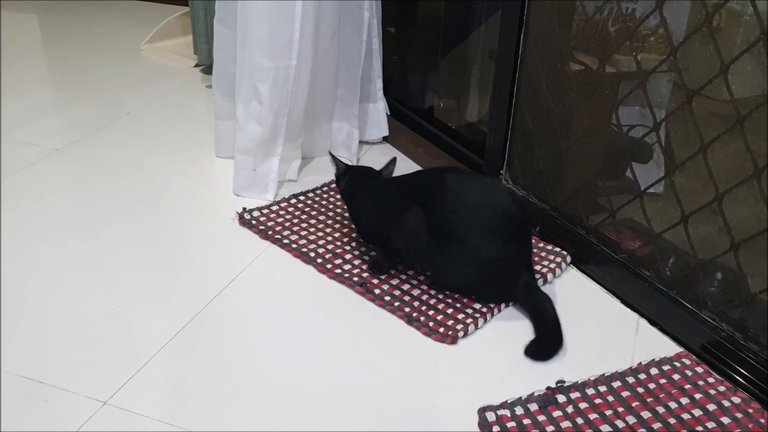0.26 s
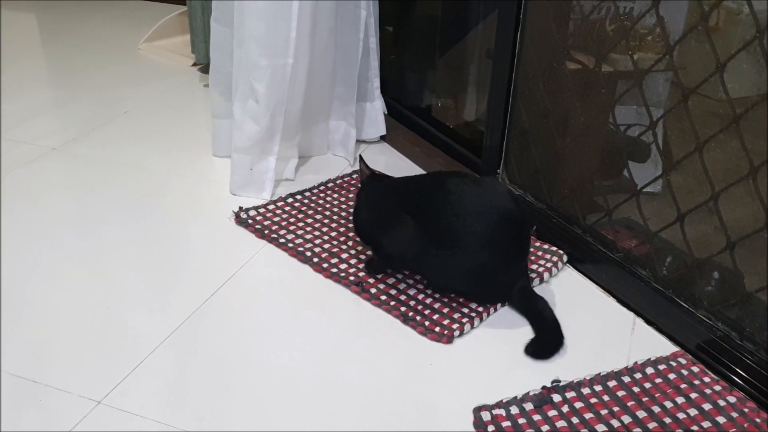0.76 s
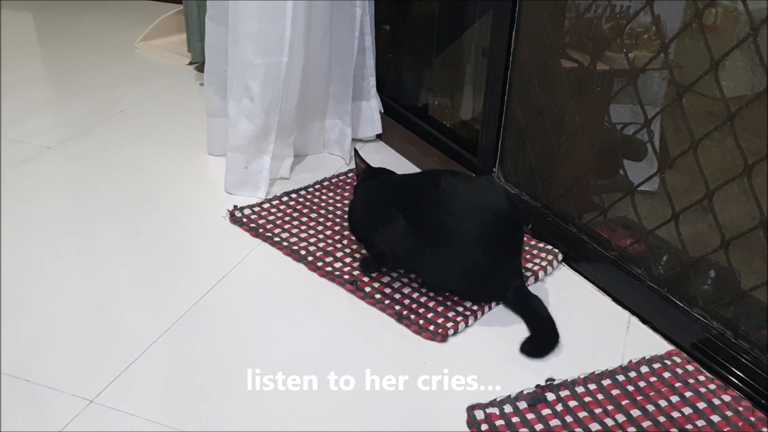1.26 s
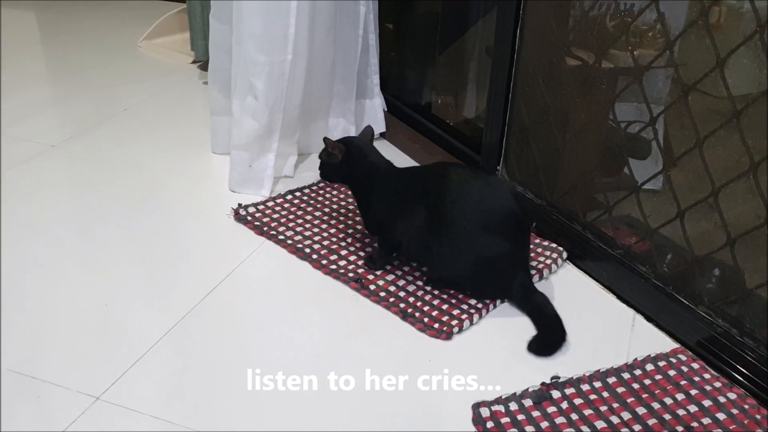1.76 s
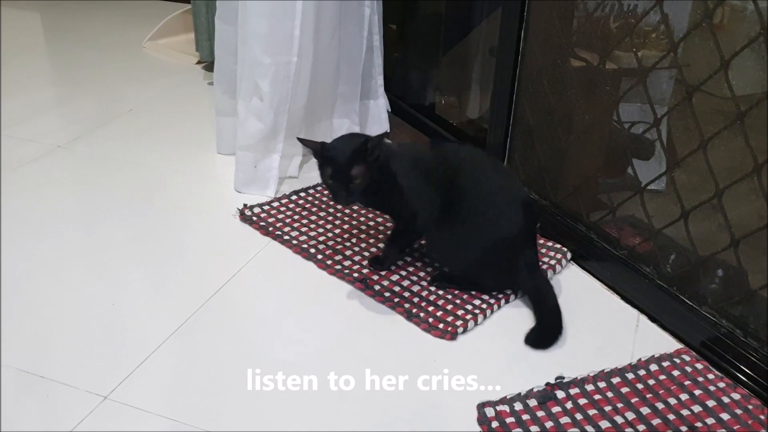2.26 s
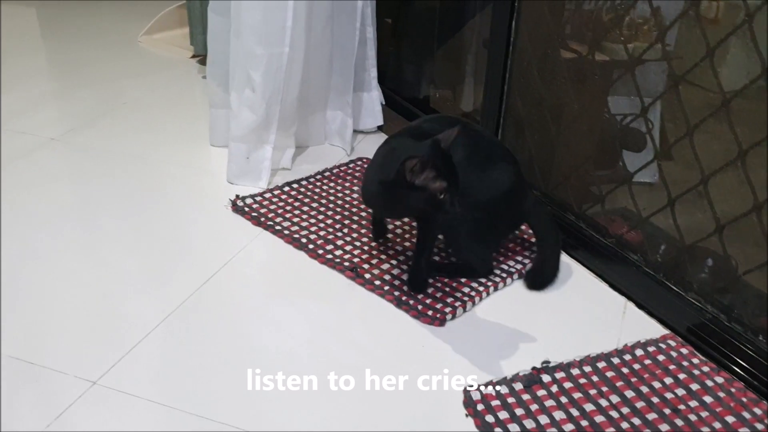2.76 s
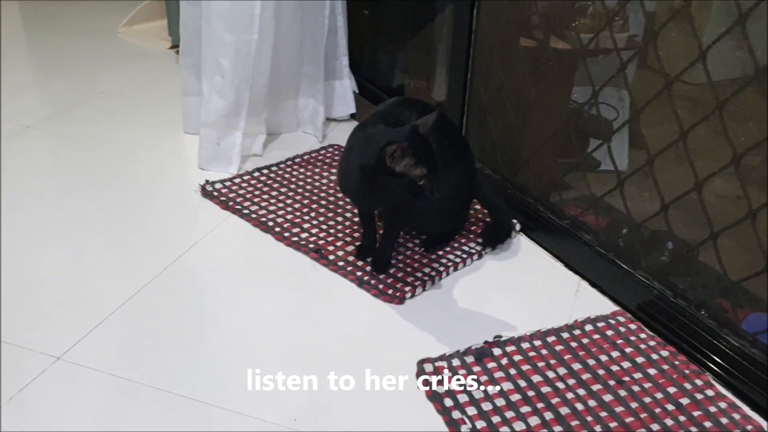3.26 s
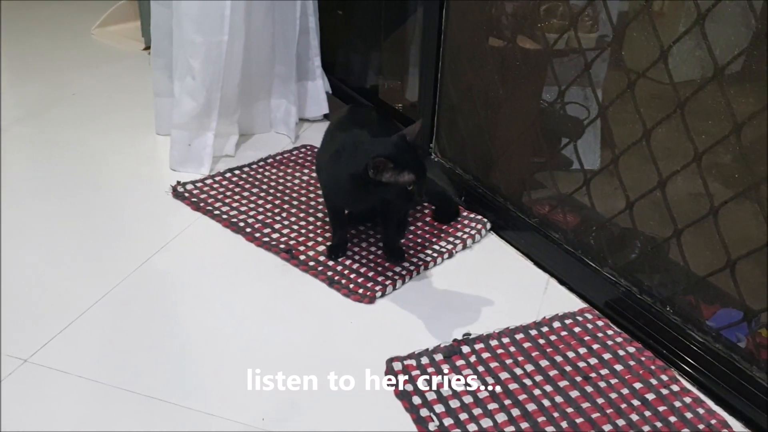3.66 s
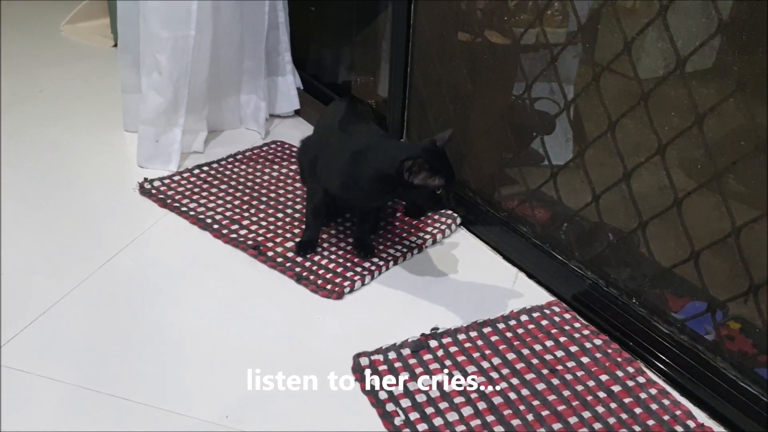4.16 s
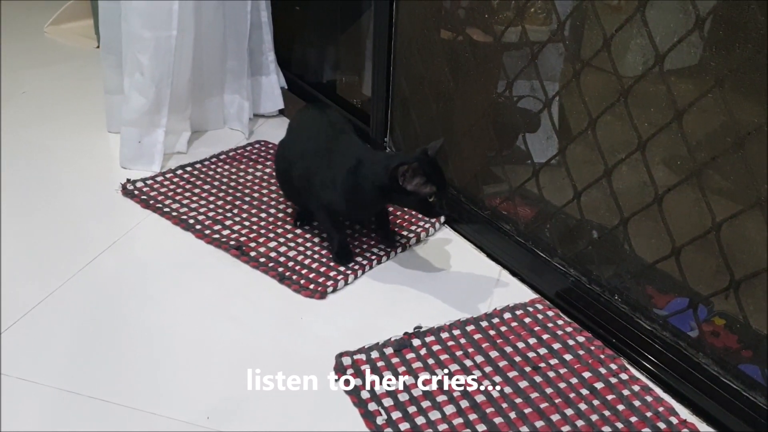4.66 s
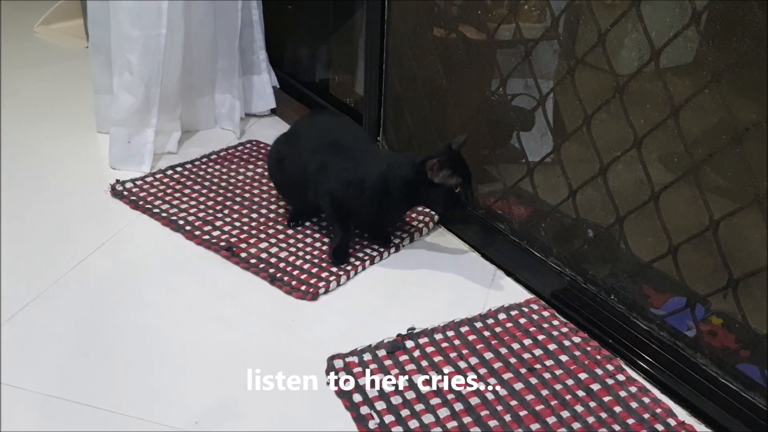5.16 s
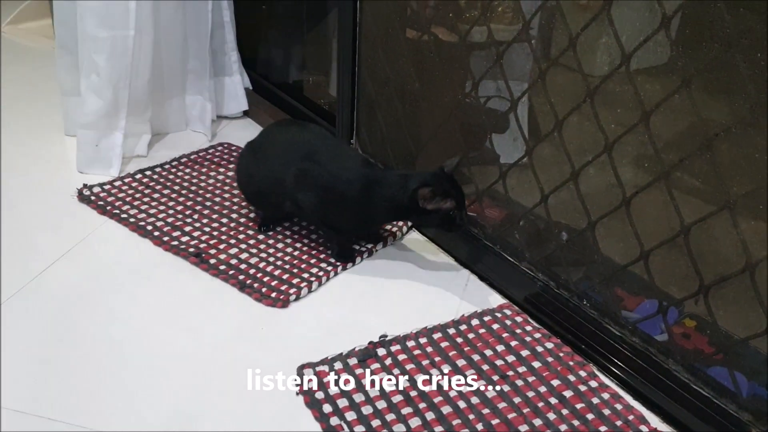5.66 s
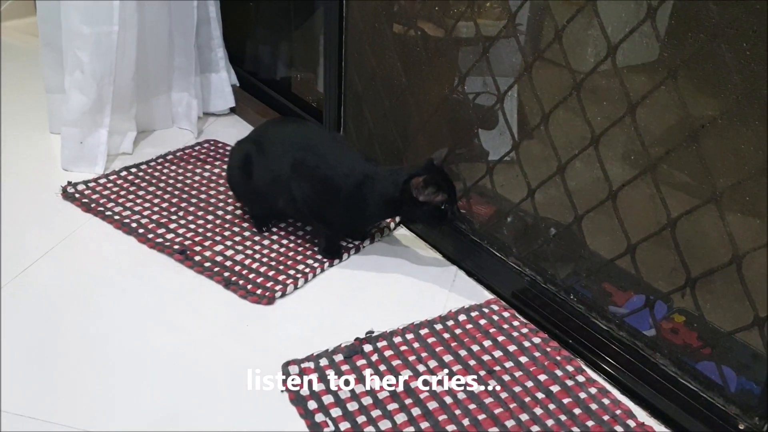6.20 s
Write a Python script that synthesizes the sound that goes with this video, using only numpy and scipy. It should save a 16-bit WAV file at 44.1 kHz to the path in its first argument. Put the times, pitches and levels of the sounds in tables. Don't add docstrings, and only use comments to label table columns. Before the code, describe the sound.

A cat about two metres away yowls four times in a hard tiled room. Two short, quiet, raspy moans come first, then a much louder open-mouthed wail and a longer, fuller final cry. Underneath, a low fan motor hums with a slow beat, something brushes faintly once a second, and insects trill very softly outside. Fur rustles slightly and claws tick before the last call. Phone pickup in stereo.

```python
import sys
import numpy as np
from scipy import signal
from scipy.fft import rfft, irfft, next_fast_len
from scipy.io import wavfile
from scipy.ndimage import map_coordinates

SR = 44100
rng = np.random.default_rng(int(sys.argv[2]) if len(sys.argv) > 2 else 0)


def store_pcm(level_fs):
    pcm = np.round(np.clip(level_fs, -1, 1) * 32767).astype(np.int16)
    wavfile.write(sys.argv[1], SR, np.atleast_2d(pcm).T)


def volts_from_db(level):
    exponent = np.asarray(level, float) / 20
    return 10 ** exponent


N = 283563


def unit(x):
    return x / np.sqrt(np.mean(x ** 2) + 1e-20)


def along(points, hz):
    f, v = np.transpose(points)
    return np.interp(np.log(hz + 1), np.log(f + 1), v)


def wobble(rate, size=N):
    steps = np.arange(0, size + 16, 16)
    knots = rng.standard_normal(int(size * rate / SR) + 5)
    return np.interp(np.arange(size), steps, map_coordinates(knots, [steps * rate / SR]))


def filtered(x, response):
    m = next_fast_len(x.shape[-1] + 8192)
    spectrum = rfft(x, m) * response(np.fft.rfftfreq(m, 1 / SR))
    return irfft(spectrum, m)[..., :x.shape[-1]]


def swells(events):
    t, env = np.arange(N) / SR, 0
    for s, length, db in events:
        u = np.clip((t - s) / length, 0, None)
        env = env + volts_from_db(db) * 4 * u * np.exp(-2 * u)
    return env


def paired(two, alike):
    turn = lambda hz: np.arccos(np.clip(along(alike, hz), -1, 1)) / 2
    mid, side = filtered(two, lambda hz: np.array([np.cos(turn(hz)), np.sin(turn(hz))]))
    return np.array([mid + side, mid - side])


# (frequency [Hz], likeness [-1 to 1])
PORT_LIKENESS = [(60, 0.99), (130, 0.88), (290, 0.44), (640, 0.68), (1410, 0.077), (3100, -0.35),
                 (6820, 0.066), (15000, -0.27)]


def rush(spectrum):
    noise = paired(rng.standard_normal((2, N)), PORT_LIKENESS)
    return unit(filtered(noise, lambda hz: volts_from_db(along(spectrum, hz))))


# (frequency [Hz], level [dB per Hz])
AIR = [(20, -31.5), (40, -8.5), (52, -6.5), (75, -4.5), (130, -2.5), (155, -12.5), (350, -17.5), (700, -33),
       (1200, -35), (6500, -42.5), (8200, -50.5), (10500, -40), (15800, -41.5)]


def room_air():
    return volts_from_db(-61.5 + 0.42 * wobble(2.3)) * rush(AIR)


# (frequency [Hz], level [dB])
TRILL = [(8700, -39.5), (9050, -2), (9400, -4), (9950, -2), (10350, -39.5)]


def insects():
    return volts_from_db(-75.5 + 0.64 * wobble(2) + 2.1 * wobble(90)) * rush(TRILL) * volts_from_db([[-1.5], [1.5]])


# (frequency [Hz], width [Hz], level over the hum [dB])
MOTOR_LINES = [(56.5, 0.85, 1), (68.3, 2.3, -16.5), (120.9, 4.3, -16)]
# (frequency [Hz], level [dB])
WHINE = [(700, -37.5), (790, -7.5), (815, -3.5), (845, -5.5), (940, -42.5)]
HUM_DB, HUM_BEAT_HZ, HUM_BEAT_DB, HUM_PEAK_S = -50, 2.15, 1.5, .29
WHINE_DB, WHINE_SWAY_DB, SWEEP_S, TURNED_AWAY_S = -85, 4.5, 3.1, 1.7


def motor():
    t, lines = np.arange(N) / SR, 0
    for hz, width, db in MOTOR_LINES:
        drift = 2 * np.pi * np.cumsum(0.36 * width * wobble(2 * width)) / SR
        strength = volts_from_db(db + 2.0 + 0.55 * width * wobble(1.5 * width + 3))
        lines = lines + strength * np.sin(2 * np.pi * hz * t + drift)
    beat_db = HUM_BEAT_DB * np.cos(2 * np.pi * HUM_BEAT_HZ * (t - HUM_PEAK_S))
    hum_db = HUM_DB + beat_db + .6 * wobble(5)
    sway_db = -WHINE_SWAY_DB * np.cos(2 * np.pi * (t - TURNED_AWAY_S) / SWEEP_S)
    whine_db = WHINE_DB + sway_db + 1.5 * wobble(3.6)
    return volts_from_db(hum_db) * lines + volts_from_db(whine_db + 2.5) * rush(WHINE)


# (frequency [Hz], level [dB])
BRUSH = [(500, -18), (1100, -6.5), (1370, 6), (1500, -3.5), (1640, -1.5), (2300, -4.5), (3500, -15.5),
         (8000, -21.5), (15000, -26)]
STROKES = [-66, -68.5, -72, -72, -66, -70.5, -65.5]
STROKE_S, STROKE_EVERY_S = .335, 0.99


def brush():
    strokes = [(STROKE_S + k * STROKE_EVERY_S, .075, db) for k, db in enumerate(STROKES)]
    return swells(strokes) * rush(BRUSH)


# (frequency [Hz], level [dB])
FUR = [(2000, 6.5), (4000, -6.5), (6500, 4.5), (8200, -12), (11000, 0.5), (15500, -8.5)]
# (time [s], length [s], level [dB])
RUSTLES = [
    (.72, 0.067, -66),
    (.97, 0.059, -66),
    (3.31, 0.046, -72),
    (4.57, 0.06, -72.5),
]


def fur():
    return swells(RUSTLES) * volts_from_db(2.6 * wobble(120)) * rush(FUR)


# (frequency [Hz], level [dB])
TICK = [(1500, -6), (3500, -2.5), (6000, -1), (9300, 11), (11000, -14), (15000, -19.5)]
# (time [s], peak level [dB])
TICKS = [
    (4.5334, -53),
    (4.5521, -42),
    (4.6084, -56),
]


def claws():
    out, t = np.zeros(N), np.arange(200) / SR
    for s, db in TICKS:
        tick = volts_from_db(db - 3 - 60 * t / .002) * np.sign(rng.standard_normal(len(t)))
        out[round(s * SR):][:len(t)] += tick
    return filtered(out, lambda hz: volts_from_db(along(TICK, hz)))


# (opening [0-1], partials 1, 2, 3, 4 under the effort [dB])
MOUTH = [(0, -0.5, -21, -21, -53), (.3, -2.5, -7, -17.5, -42), (.5, -10, -0.5, -19, -27),
         (.65, -15, -2, -6, -20), (.78, -24.5, -1, -14.5, -9), (1, -18, -9.5, -9.5, -3)]


def mouth_levels(t, effort_db, mouth, tongue, quaver):
    opening, *shapes = np.transpose(MOUTH)
    levels_db = []
    for shape_db, lift_db in zip(shapes, tongue):
        levels_db.append(effort_db + np.interp(mouth, opening, shape_db) + lift_db * mouth)
    crest_s, quaver_hz, depth_db = quaver
    pushed = volts_from_db((effort_db - effort_db.max()) / 2)
    levels_db[1] += depth_db * pushed * np.cos(2 * np.pi * quaver_hz * (t - crest_s))
    return levels_db


FLUTTER_DB = 13


def low_partials(levels_db, hoarse, turn):
    n, voice = len(turn), 0
    flutter_db = FLUTTER_DB * hoarse * np.minimum(wobble(70, n), .2)
    for k, db in enumerate(levels_db, 1):
        sway_db = (0.41 + 1.1 * hoarse) * wobble(30, n) + 1.4 * wobble(13.98, n)
        voice = voice + volts_from_db(db + sway_db + flutter_db) * np.sin(k * turn)
    return voice


SLACK_DB, TAUT_DB = -46, -34


def upper_partials(hz, strain_db, hoarse, turn, throat, peak_hz, height_db):
    upper, power = 0, 1e-12
    taut = np.interp(strain_db, [SLACK_DB, TAUT_DB], [0, 1])
    full_lift_db = height_db * np.clip(1 - hoarse, 0, 1) * taut
    for k in np.arange(7, 24):
        lift_db = full_lift_db / (1 + ((k * hz - peak_hz) / 380) ** 2)
        gain = volts_from_db(along(throat, k * hz) + lift_db)
        tone = np.sin(k * turn + rng.uniform(0, 2 * np.pi))
        upper = upper + gain * volts_from_db(4 * wobble(12.2, len(turn))) * tone
        power = power + gain ** 2
    return upper / np.sqrt(power)


BREATH_FOLLOWS, HISS_FOLLOWS = .16, .3
BREATH_HOARSE_DB, SHUT_DULLS_DB = 7, 13


def breath_air(puffs, under_peak_db, mouth, hoarse, spectrum, full_db):
    breath_db = full_db + BREATH_FOLLOWS * under_peak_db + BREATH_HOARSE_DB * (hoarse - .4)
    breath = filtered(puffs, lambda f: volts_from_db(along(spectrum + [(9000, -69.5)], f)))
    breath = volts_from_db(breath_db) * unit(breath)
    deep = filtered(breath, lambda f: f < 700)
    lips_db = SHUT_DULLS_DB * (np.clip(mouth, 0, 1) - 0.67)
    hiss_db = HISS_FOLLOWS * np.minimum(under_peak_db + 15, 0)
    return deep + (breath - deep) * volts_from_db(lips_db + hiss_db)


def throat_rasp(puffs, bright_db, hoarse, throat):
    noise = unit(filtered(puffs, lambda f: volts_from_db(along(throat, f)) * (f > 3200)))
    return volts_from_db(bright_db - 16.5) * np.minimum(.3 + 7 * hoarse, 5) * noise


def yowl(rows, throat, breath_spectrum, tract, rough, quaver, tongue):
    s, *cols = np.transpose(rows)
    t = np.arange(s[0], s[-1], 1 / SR)
    n, since, left = len(t), t - t[0], t[-1] - t
    hz, effort_db, mouth, strain_db = [np.interp(t, s, c) for c in cols]
    bright_db = effort_db + strain_db
    first_hz, last_hz, height_db, full_breath_db = tract
    peak_hz = np.interp(t, s[[0, -1]], [first_hz, last_hz])

    steady, first, fade_s, last, rise_s = rough
    hoarse = steady + first * np.exp(-since / fade_s) + last * np.exp(-left / rise_s)
    jitter = .002 * wobble(40, n) + .035 * hoarse * wobble(140, n)
    turn = 2 * np.pi * np.cumsum(hz * (1 + jitter)) / SR

    low_db = mouth_levels(t, effort_db, mouth, tongue, quaver)
    bridge_db = (low_db[-1] + bright_db) / 2 + 9 - 9 * hoarse
    low_db += [bridge_db + along(throat, k * hz) for k in (5, 6)]
    voice = low_partials(low_db, hoarse, turn)
    upper = upper_partials(hz, strain_db, hoarse, turn, throat, peak_hz, height_db)
    voice = voice + volts_from_db(bright_db - 8.1 * hoarse) * upper
    voice = np.sqrt(2) * voice * (1 + .35 * hoarse * wobble(250, n))

    puffs = rng.standard_normal((2, n)) * (1 + 0.77 * np.cos(turn))
    under_peak_db = effort_db - effort_db.max()
    breath = breath_air(puffs[0], under_peak_db, mouth, hoarse, breath_spectrum, full_breath_db)
    rasp = throat_rasp(puffs[1], bright_db, hoarse, throat)
    voice_edge = np.clip(np.minimum(since / .011, left / .04), 0, 1)
    breath_edge = np.clip(np.minimum(since, left) / 0.038, 0, 1)
    call = (voice + rasp) * voice_edge + breath * breath_edge
    return np.pad(call, (round(s[0] * SR), N))[:N]


# (time [s], pitch [Hz], effort [dB], mouth opening [0-1], strain [dB])
YOWL_1 = [
    (.63, 451.7, -72, 0, -30),
    (.71, 498.4, -57.5, 0.25, -23),
    (.8, 484, -58, 0.31, -30),
    (.95, 488.7, -57, 0.28, -28),
    (1.03, 515.5, -51.5, 0.33, -31),
    (1.09, 509.3, -50, 0.29, -32),
    (1.125, 487.7, -49, 0.32, -39),
    (1.21, 489.5, -69, 0.22, -32),
]
YOWL_2 = [
    (2.01, 413, -71, .05, -32),
    (2.09, 445.7, -61.5, 0.022, -40),
    (2.22, 499.6, -54, 0.018, -46),
    (2.3, 520, -57.5, 0.25, -44.5),
    (2.33, 525.8, -49, 0.73, -20.5),
    (2.439, 546, -51, 0.94, -19.5),
    (2.52, 550.3, -57, .7, -21),
    (2.6, 553, -62, 0.89, -25),
    (2.71, 582, -72.5, 0.54, -28),
]
YOWL_3 = [
    (3.51, 505, -75, .4, -33),
    (3.63, 528, -46, .68, -40),
    (3.87, 554.7, -39.5, 0.82, -34.5),
    (3.939, 566, -30.5, 0.79, -31.5),
    (4.099, 563, -30.5, 0.77, -26.5),
    (4.159, 568.2, -45, 1, -19),
    (4.32, 563.2, -43, 0.95, -24.5),
    (4.35, 531, -44, .32, -21),
    (4.43, 524, -52, .6, -15),
]
YOWL_4 = [
    (5.18, 640.6, -90.5, 0.3, -22.5),
    (5.29, 475.7, -40.5, 0.73, -45),
    (5.391, 479, -38, 0.58, -44.5),
    (5.51, 501.1, -30, 0.45, -45),
    (5.64, 500.1, -27.5, 0.44, -33),
    (5.85, 498.6, -27, .5, -24),
    (5.93, 510.8, -37, 0.86, -20.5),
    (5.99, 555.5, -44, 0.78, -21),
    (6.075, 535.4, -48, .33, -17),
]
# (frequency [Hz], level [dB])
THROATS = [
    [(2400, -16), (4000, -6), (6500, -7), (15500, -11)],
    [(2700, -26), (3300, -37), (4430, -25), (5500, -4), (7450, -31), (10600, -30), (15500, -20)],
    [(2800, -16), (3400, -39.5), (4000, -13), (4500, -19), (5100, -12), (6300, -7), (7600, -24.5),
     (10800, -18.5), (15500, -41.5)],
    [(2500, -35.5), (3000, -35), (3600, -25), (4200, -9), (5200, -18.5), (6000, -16.5), (7200, -21),
     (8400, -29.5), (10000, -27.5), (13500, -29), (15500, -36.5)],
]
# (frequency [Hz], level [dB])
BREATHS = [
    [(200, -15.5), (450, 1), (800, -11.5), (1350, -5), (1750, -19), (3000, -26)],
    [(200, -15), (400, 1), (1000, -4), (2300, -11.5), (3000, -19.5)],
    [(200, -18.5), (380, -2), (1100, -7), (2300, -3.5), (3100, -24)],
    [(130, -11.5), (280, 4.5), (400, -7), (1000, -3.5), (2200, -6.5), (2800, -20)],
]
# (upper resonance at start [Hz], at end [Hz], its height [dB], breath at full effort [dB])
AIRWAYS = [(6300, 6900, 18, -66.5), (5870, 5750, 13, -71), (6700, 6900, 8, -68), (3550, 4900, 23, -63)]
# (steady hoarseness [0-1], added at start [0-1], its fade [s], added at end, its rise [s])
HOARSE = [(.34, .35, .2, .3, .03), (.25, .2, .08, .4, .05), (.16, .4, .08, 1.6, .06),
          (.04, .6, .14, 1.3, .09)]
# (a crest [s], rate [Hz], depth at full effort [dB])
QUAVERS = [(1.128, 16, 3.5), (2.35, 12, 2.5), (3.935, 12.23, 4), (5.7, 6.8, 1)]
# (partials 1, 2, 3, 4 [dB])
TONGUES = [(-3.5, 1, 5, -3), (11, -0.5, .1, -.5), (-0.5, -2, 2, 3.5), (-9, 1.0, -5, 3)]


def cat():
    calls = (YOWL_1, YOWL_2, YOWL_3, YOWL_4)
    return sum(map(yowl, calls, THROATS, BREATHS, AIRWAYS, HOARSE, QUAVERS, TONGUES))


# (frequency [Hz], time to fall 60 dB [s])
ROOM = [(300, .42), (1000, .43), (2200, .45), (8000, .3)]
# (frequency [Hz], likeness [-1 to 1])
ROOM_LIKENESS = [(300, 0.75), (600, 1), (1100, 0.25), (2000, 0.056)]


def room(x):
    hz, t, z = signal.stft(rng.standard_normal((2, SR * 3 // 4)), SR, nperseg=256)
    decay = volts_from_db(-60 * t / along(ROOM, hz)[:, None])
    tail = paired(signal.istft(z * decay, SR, nperseg=256)[1], ROOM_LIKENESS)
    tail = filtered(tail, lambda f: 1 / np.sqrt(along(ROOM, f)))
    tail = tail / np.linalg.norm(tail[0])
    delayed = np.pad(x, (250, 0))[None]
    return signal.fftconvolve(delayed, tail, axes=1)[:, :N]


# (frequency [Hz], left minus right [dB])
CAT_PAN = [(450, 1), (600, -0.5), (1000, -2), (1150, -4), (1600, 3), (2200, 2.5), (4500, 4.5), (9000, 0.5)]
# (frequency [Hz], left trails right by [radians])
CAT_LAG = [(500, 0.11), (1100, 0.88), (2200, 1.61), (4300, 0.9), (9000, 2.1)]


def from_the_side(x):
    side = np.array([[.5], [-.5]])
    return filtered(x, lambda hz: volts_from_db(side * along(CAT_PAN, hz)) * np.exp(-1j * side * along(CAT_LAG, hz)))


def scene():
    voice, tick = cat(), claws()
    near = volts_from_db(1.75) * voice + tick + volts_from_db(-5) * room(voice + 0.49 * tick)
    return from_the_side(near) + motor() + room_air() + insects() + brush() + fur()


# (frequency [Hz], left minus right [dB])
PORTS = [(60, 4.5), (110, 3.5), (200, 6), (380, 5.5), (700, 10.5), (1290, 4.5), (2380, 0.5), (4400, 1),
         (8120, -1), (15000, -3.5)]


def phone_ports(x):
    side = np.array([[.5], [-.5]])
    return filtered(x, lambda hz: volts_from_db(side * along(PORTS, hz)))


def roll_off(x):
    return signal.sosfilt(signal.butter(12, 15810, fs=SR, output="sos"), x)


def record(dry):
    mix = phone_ports(dry)
    return roll_off(mix)


dry = scene()
out = record(dry)
store_pcm(out)
```